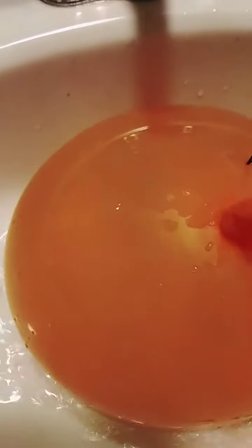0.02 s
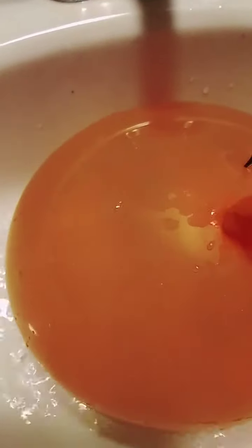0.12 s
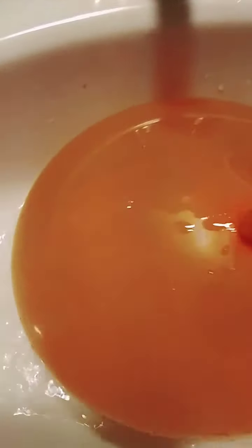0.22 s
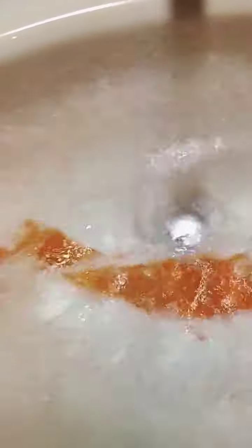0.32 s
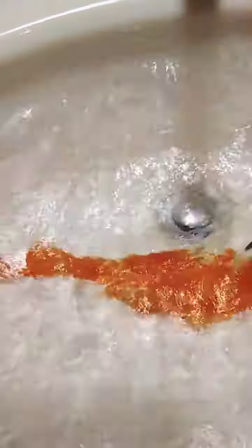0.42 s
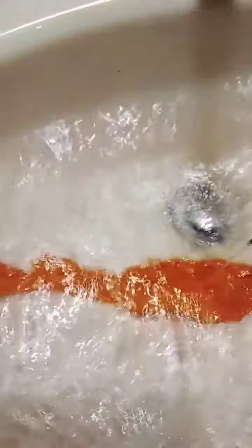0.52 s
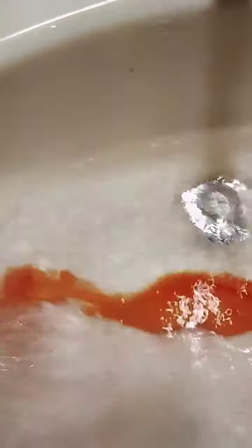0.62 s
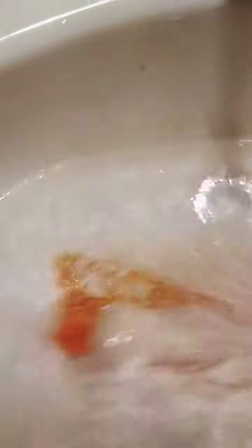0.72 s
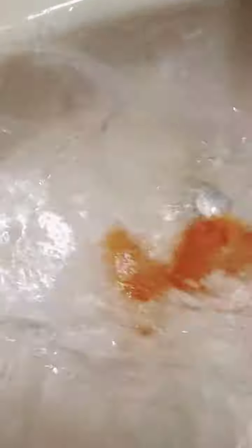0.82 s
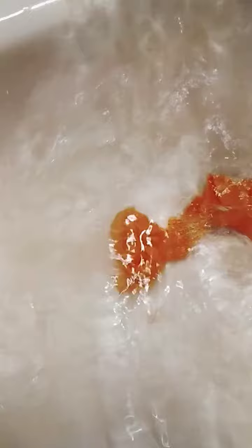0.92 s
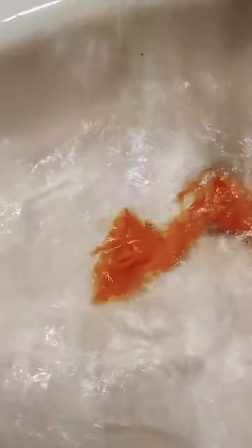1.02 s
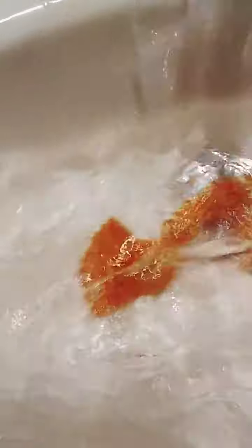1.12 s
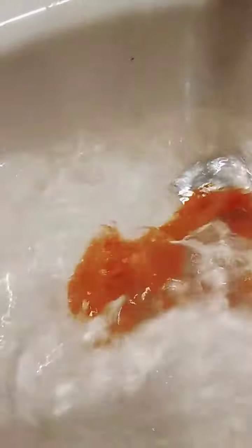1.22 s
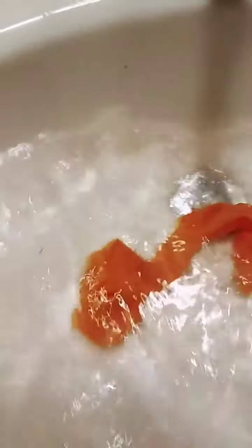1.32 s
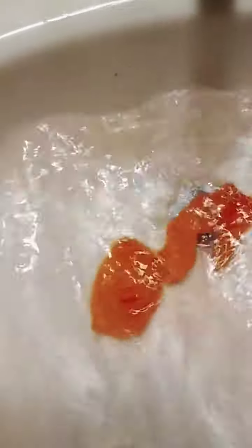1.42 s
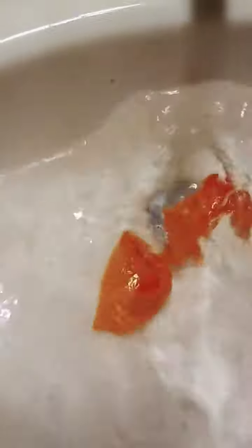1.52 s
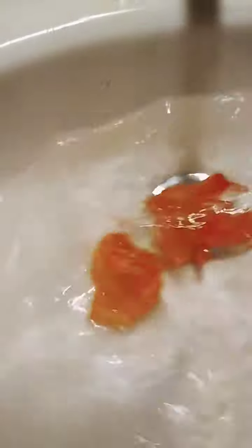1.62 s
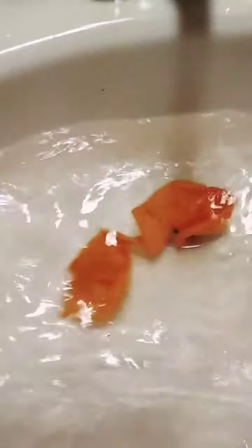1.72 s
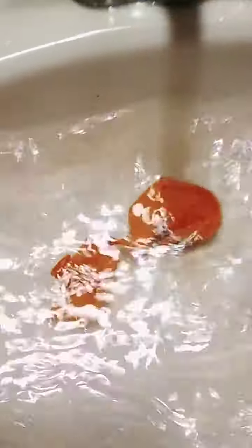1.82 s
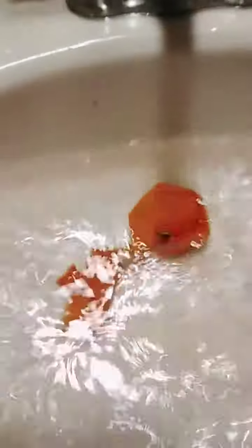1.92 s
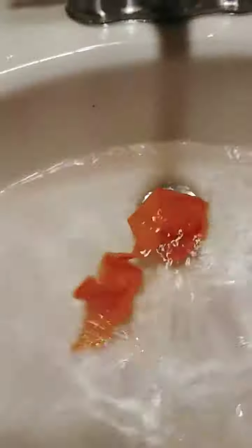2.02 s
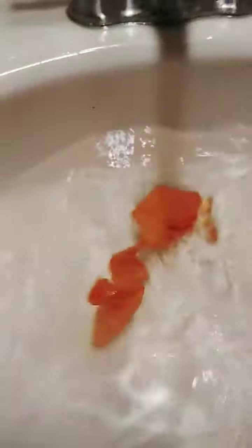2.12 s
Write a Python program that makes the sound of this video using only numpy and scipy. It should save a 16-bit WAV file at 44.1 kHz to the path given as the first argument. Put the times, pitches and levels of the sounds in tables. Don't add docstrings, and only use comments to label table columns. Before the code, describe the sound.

Water balloon bursting in a ceramic sink, heard close in a small tiled room. Near quiet with faint ticks until 0.2 s, then a loud, bright, crackling splash at 0.23 s with a soft low basin thud. Splats, plinks and slosh continue, with fresh surges near 0.65, 0.8 and 0.9 s, thinning after 1.2 s. A small spurt and gulp at 1.5 s, sparse drips, near silence, tiny drops at 2.0 and 2.2 s.

```python
import sys
import numpy as np
from scipy import signal
from scipy.fft import rfft, irfft, next_fast_len
from scipy.io import wavfile

SR = 44100
rng = np.random.default_rng(int(sys.argv[2]) if len(sys.argv) > 2 else 0)


def gain_from_db(level_db):
    decades = np.asarray(level_db, float) / 20
    return 10 ** decades


def digitize_waveform(pressure):
    field = np.atleast_2d(pressure).T
    bounded = np.clip(field, -1, 1)
    quanta = np.round(bounded * 32767).astype(np.int16)
    wavfile.write(sys.argv[1], SR, quanta)


N = 97020

# (frequency [Hz], level [dB])
SPRAY_COLOUR = [(2000, -23), (4500, -5.5), (6500, -12), (8000, -3), (11000, -5), (13500, -14), (16000, -14)]
# (frequency [Hz], level [dB])
SPRAY_EDGE = [(4200, -20), (6000, 1)]
# (time [s], peak level [dB], pitch [Hz], t60 [s])
PLINKS = [(0.173, -41, 3700, 0.047), (0.26, -19.5, 975, 0.047), (0.314, -12.5, 2580, 0.0077),
          (0.406, -16.5, 1410, 0.01), (.615, -32, 1430, 0.088), (0.476, -31, 456, 0.079),
          (0.546, -29, 1597, 0.066), (0.577, -29.5, 2867, 0.03), (0.649, -27.5, 1470, 0.11),
          (0.708, -21.5, 1410, 0.022), (.795, -27.5, 2425, .03), (1.366, -32.5, 2970, 0.023),
          (0.776, -9.5, 2887, 0.015), (0.915, -12.5, 1570, 0.07), (1.025, -23, 1840, 0.023),
          (1.188, -25.5, 1327, 0.076), (.001, -38.5, 1713, 0.056), (1.308, -45, 3185, 0.029),
          (1.47, -46, 3130, 0.034), (1.625, -57.5, 2570, 0.086)]


def level_in_time(rows):
    return gain_from_db(np.interp(np.arange(N) / SR, *np.transpose(rows)))


def colour(x, points):
    hz, db = np.transpose(points)
    log_hz = np.log(np.arange(N // 2 + 1) * SR / N + 1)
    return irfft(rfft(x) * gain_from_db(np.interp(log_hz, np.log(hz), db)), N)


def rms_one(x):
    return x / np.sqrt(np.mean(x ** 2) + 1e-20)


def drift(rate_hz):
    pole = np.exp(-2 * np.pi * rate_hz / SR)
    noise = rng.standard_normal(N + SR)
    return rms_one(signal.lfilter([1], [1, -2 * pole, pole * pole], noise)[SR:])


def ring(push, hz, t60):
    r, w = gain_from_db(-60 / (t60 * SR)), 2 * np.pi * hz / SR
    return signal.lfilter([0, np.sin(w)], [1, -2 * r * np.cos(w), r * r], push + 1e-18)


def add(out, s, x):
    i = int(np.clip(s * SR, 0, N))
    out[i:i + len(x)] += x[:N - i]


def grains(per_s, cycles, spread_db, clump_db, low_hz, high_hz):
    size_db = spread_db * np.minimum(rng.exponential(1, N), 4) + clump_db * drift(29)
    clicks = gain_from_db(size_db) * rng.choice([-1, 1], N) * (rng.random(N) < per_s / SR)
    pitch_class = rng.integers(0, 24, N)
    out = np.zeros(N)
    for k, hz in enumerate(np.geomspace(low_hz, high_hz, 24)):
        out += ring(clicks * (pitch_class == k), hz, cycles / hz)
    return rms_one(out) * np.sqrt(np.mean(out ** 2))


def spray():
    # (time [s], level [dB])
    spray_level = [(0, -35.5), (.1, -72), (.16, -58.5), (.217, -34.5), (.226, -5.5), (.245, -22.5),
                   (.26, -22), (.345, -27.5), (.42, -31), (.63, -42), (.65, -24.5), (.76, -38), (.8, -35.5),
                   (.9, -24.5), (1.12, -44.5), (1.18, -32), (1.3, -50.5), (1.4, -72)]
    # (time [s], level [dB])
    trickle_level = [
        (1.48, -69),
        (1.52, -29.5),
        (1.59, -51),
        (1.65, -50),
        (1.71, -48),
        (1.77, -68),
        (1.92, -78),
        (2, -49),
        (2.1, -78),
        (2.2, -72.5),
    ]
    hiss = grains(14000, cycles=16, spread_db=2.5, clump_db=2, low_hz=2300, high_hz=15500)
    hiss = rms_one(colour(hiss, SPRAY_COLOUR))
    moving = level_in_time(spray_level) * colour(hiss, SPRAY_EDGE)
    trickle_colour = [(5300, -30), (7500, 0), (12000, 0), (13000, -8)]
    trickle = level_in_time(trickle_level) * colour(hiss, trickle_colour)
    return np.where(np.arange(N) < 1.44 * SR, moving, trickle)


def bubbles(per_s, cycles, low_hz, high_hz):
    spread_db, rise_per_cycle = 3.5, .01
    out = np.zeros(N)
    for when, pitch, size, rise in rng.random((4000, 4))[:int(per_s * N / SR)]:
        hz = low_hz * (high_hz / low_hz) ** pitch
        turns = np.arange(int(cycles / hz * SR)) * hz / SR
        level_db = -spread_db * np.log(size + 0.0079) + 8 * pitch - 50 * turns / cycles
        shape = gain_from_db(level_db) * np.minimum(turns / 1.6, 1)
        phase = 2 * np.pi * turns * (1 + rise_per_cycle * rise * turns)
        add(out, when * N / SR, shape * np.sin(phase))
    return rms_one(out)


def splash_level():
    splash_db, splash_s = -13.5, 0.0064
    out, t = np.zeros(N), np.arange(4000) / SR
    for s, db, hz, t60 in PLINKS:
        add(out, s, gain_from_db(db + splash_db - 9 * t / splash_s) * np.minimum(t / .003, 1))
    return out


def slosh():
    # (time [s], level [dB])
    slosh_rows = [(0, -63), (.05, -101), (.2, -101), (.225, -30), (.33, -32), (.53, -46), (.65, -39.5),
                  (.76, -41.5), (.8, -31.5), (.9, -39), (1.03, -39), (1.12, -58.5), (1.16, -38),
                  (1.27, -52.5), (1.4, -85), (2.18, -80.5), (2.192, -52.5)]
    level = level_in_time(slosh_rows) + splash_level()
    return level * bubbles(1800, cycles=16, low_hz=1057, high_hz=6500)


def gurgle():
    # (time [s], level [dB])
    surge_level = [(0, -59.5), (.2, -102), (.23, -52.5), (.29, -33.5), (.38, -55.5), (.47, -30.5),
                   (.58, -51.5), (.7, -61), (1.0, -79), (1.2, -94), (1.27, -62), (1.4, -66), (1.75, -82)]
    # (time [s], level [dB])
    drain_level = [(.2, -79), (.3, -53), (.55, -50), (.7, -63), (.78, -52), (.9, -71), (1.05, -54),
                   (1.15, -70), (1.3, -71), (1.44, -76.5), (1.54, -45), (1.62, -71.5), (1.72, -83.5)]
    surge = level_in_time(surge_level) * bubbles(800, cycles=8, low_hz=300, high_hz=800)
    drain = level_in_time(drain_level) * bubbles(200, cycles=8, low_hz=150, high_hz=480)
    return surge + drain


def plinks():
    rise_oct_per_s, attack_s = 7.7, 0.0013
    out, t = np.zeros(N), np.arange(6000) / SR
    for s, db, hz, t60 in PLINKS:
        phase = 2 * np.pi * np.cumsum(hz * 2 ** (rise_oct_per_s * t)) / SR
        attack = np.sin(np.pi / 2 * np.minimum(t / attack_s, 1)) ** 2
        add(out, s, gain_from_db(db - 60 * t / t60) * attack * np.sin(phase))
    return out


def gulps():
    # (time [s], length [s], level [dB], start pitch [Hz], end pitch [Hz])
    gulp_rows = [(.008, 0.062, -51, 576, 760), (0.034, 0.015, -45.5, 730, 1240),
                 (0.308, 0.029, -30.5, 209, 237), (0.775, 0.035, -33.5, 1102, 1310),
                 (0.806, 0.025, -26, 994, 1683), (0.915, 0.027, -25, 766, 1150),
                 (0.948, 0.034, -27.5, 754, 1510), (1.215, 0.021, -32.5, 898, 1099),
                 (1.322, 0.022, -32.5, 1100, 2845), (1.371, .088, -38, 620, 1490),
                 (0.59, 0.014, -30.5, 3470, 5300), (1.305, 0.011, -49, 1150, 1200),
                 (1.479, 0.012, -42, 430, 700), (1.495, 0.073, -39, 557, 2041),
                 (1.521, 0.105, -48.5, 323.5, 449)]
    bend = 1.4
    out, wobble = np.zeros(N), 1 + .2 * drift(60)
    for s, length, db, start_hz, end_hz in gulp_rows:
        u = np.linspace(0, 1, int(length * SR))
        phase = 2 * np.pi * np.cumsum(start_hz + (end_hz - start_hz) * u ** bend) / SR
        swell = np.minimum(u / 0.19, 1) ** 1.5
        fade = np.minimum((1 - u) / .5, 1)
        add(out, s, gain_from_db(db) * swell * fade * np.sin(phase))
    return out * wobble


def burst(db, hz, length, spread_oct):
    ring_cycles = 46.9
    when, pitch, size = rng.random(12), rng.standard_normal(12), rng.random(12)
    when[0], pitch[0], size[0] = .15, 0, 0
    bunch, t = np.zeros(2400), np.arange(400) / SR
    for k in range(12):
        f = min(hz * 2 ** (spread_oct * pitch[k]), 15500)
        attack = np.minimum(t * f / 4, 1) ** 2
        grain = np.sin(2 * np.pi * f * t) * gain_from_db(-60 * t * f / ring_cycles) * attack
        add(bunch, min(when[k] * length, .04), gain_from_db(db - 4.8 * when[k] - 16 * size[k]) * grain)
    return bunch


def splats():
    # (time [s], peak level [dB], pitch [Hz], length [s])
    full_splats = [(0.0103, -21.5, 8360, .003), (0.1155, -37.5, 10000, .007), (.126, -42.5, 10500, .004),
                   (0.163, -42, 8300, .004), (0.171, -26, 10000, .0057), (0.194, -20, 8200, .0086),
                   (0.209, -21, 8100, .005), (0.2202, 2, 8530, .003), (0.2238, 3, 7890, .005),
                   (0.2321, 9, 8840, .005), (0.238, 6, 7960, .006), (.281, -11.5, 8500, .003),
                   (0.312, -2.5, 7970, .003), (.316, -4, 6820, .003), (0.325, -4, 7740, .005),
                   (0.3396, -1, 7740, .005), (.398, -10.5, 8450, .005), (0.4502, -13, 7850, .003),
                   (0.478, -10, 8850, .005), (0.5463, -6.5, 7500, .003), (.591, -20, 7850, .005),
                   (0.602, -22.5, 9700, .003), (0.6367, -4, 7800, .004), (.646, -6, 8050, .004),
                   (0.7355, -17.5, 11600, .004), (0.756, -21.5, 8900, .003), (0.7722, -0.5, 7900, .005),
                   (0.7935, -9, 7670, .005), (.806, -10, 8000, .005), (0.842, -13.5, 8700, .007),
                   (.856, -10.5, 8400, .004), (.8725, 1, 7670, .003), (.9, -7, 7950, .003),
                   (0.941, -6, 7860, .005), (0.973, -16.5, 8650, .004)]
    # (time [s], peak level [dB], pitch [Hz])
    late_splats = [(1.0202, -17.5, 8500), (1.0246, -12, 7700), (1.0347, -12.5, 8820), (1.0956, -16, 10200),
                   (1.1374, -11.5, 9320), (1.1436, -13.5, 6870), (1.1663, -12, 7000), (1.186, -13.5, 7700),
                   (1.2234, -26.5, 6260), (1.2331, -22, 9200), (1.2578, -24.5, 8750), (1.295, -32, 7760),
                   (1.3097, -31, 6960), (1.3824, -49.5, 7010), (1.4115, -48, 10800), (1.4953, -23, 11600),
                   (1.5163, -14, 8600), (1.5228, -17, 6900), (1.5874, -30, 9900), (1.5965, -33.5, 6910),
                   (1.6035, -15, 9630), (1.6144, -48, 6580), (1.622, -21.5, 7460), (1.6643, -32.5, 6650),
                   (1.6726, -24, 12500), (1.6913, -20.5, 9900), (1.7016, -28.5, 10200),
                   (1.771, -42.5, 9210), (1.9378, -48, 8470), (1.9617, -41.5, 7700), (1.9871, -34, 7070),
                   (1.9939, -32.5, 10940), (2.1442, -57.5, 7660), (2.189, -23, 8800), (2.1954, -19.5, 8400)]
    # (time [s], peak level [dB], pitch [Hz])
    slap_rows = [(0.1913, -21, 5300), (0.207, -17, 5570), (0.313, -8, 2440), (0.3662, -24, 5300),
                 (0.3955, -13, 4420), (0.4752, -13.5, 4200), (0.547, -15, 3210), (0.6384, -12.5, 4000),
                 (0.6481, -10.5, 2950), (0.706, -12, 3430), (0.734, -18.5, 3270), (0.7642, -33, 2970),
                 (0.796, -18, 3100), (0.8537, -13.5, 4230), (1.059, -24, 3400), (1.163, -16.5, 5300),
                 (1.2222, -15.5, 4600), (1.4966, -30, 5200), (1.688, -55.5, 2730)]
    late_s, hiss_db, hiss_rise_s = .0026, -10.5, 0.0012
    out, hiss_level, t = np.zeros(N), np.zeros(N), np.arange(2000) / SR
    for s, db, hz, length in full_splats + [(*row, late_s) for row in late_splats]:
        add(out, s, burst(db + 0.5, hz, length, spread_oct=0.17))
        add(hiss_level, s, gain_from_db(db + hiss_db - 9 * t / length) * np.minimum(t / hiss_rise_s, 1))
    for s, db, hz in slap_rows:
        add(out, s, burst(db - 2.5, hz, length=0.0061, spread_oct=.35))
    hiss = colour(colour(rng.standard_normal(N), SPRAY_COLOUR), SPRAY_EDGE)
    return out + hiss_level * rms_one(hiss)


def basin():
    # (time [s], peak level [dB])
    surge_rows = [(0.218, -35), (0.273, -31.5), (0.326, -43), (0.447, -50), (0.542, -40), (0.608, -44),
                  (0.793, -42.5), (0.858, -49), (0.945, -39), (1.154, -49.5), (1.294, -51.5),
                  (1.387, -61.5), (1.548, -65), (1.09, -53), (1.239, -52), (1.5, -63.5), (1.64, -68),
                  (1.794, -54), (1.85, -63), (2.169, -63.5)]
    # (frequency [Hz], level [dB], t60 [s])
    modes = [
        (73, 4.5, 0.28),
        (101.3, -9, 0.45),
        (123.9, 7.5, 0.15),
        (206, -31.5, .1),
    ]
    surge_s = 0.015
    out, t = np.zeros(N), np.arange(3000) / SR
    for hz, mode_db, t60 in modes:
        push = np.zeros(N)
        for s, db in surge_rows:
            add(push, s, gain_from_db(db + mode_db - 45.5 - 9 * t / surge_s) * np.minimum(t / .004, 1))
        out += ring(push * drift(270), hz, t60)
    return out


def room(x):
    t60_s, wall_cut_hz = 0.17, 11000
    size = next_fast_len(N + SR)
    w = 2 * np.pi * np.arange(size // 2 + 1) / size
    dull = 1 / (1 + 1j * w * SR / (2 * np.pi * wall_cut_hz)) ** .2
    echo = 0
    for k, lag in enumerate(rng.uniform(.003, .017, 12) * SR):
        loop = gain_from_db(-60 * lag / SR / t60_s) * dull * np.exp(-1j * w * lag)
        echo = echo + (-1) ** k * loop / (1 - loop)
    return irfft(rfft(x, size) * echo, size)[:N]


def quiet_floor():
    # (frequency [Hz], level [dB])
    floor_colour = [(50, -13), (125, -7), (300, -24), (600, -23.5), (1000, -16.5), (1800, -35),
                    (16000, -46)]
    return gain_from_db(-75.5) * rms_one(colour(rng.standard_normal(N), floor_colour))


def scene():
    water = spray() + slosh() + gurgle() + splats()
    ringing = plinks() + gulps()
    echoes = gain_from_db(-21.5) * room(water + gain_from_db(0.5) * ringing)
    return (water + ringing + echoes + basin() + quiet_floor())[None]


def band_limit(x):
    return signal.sosfilt(signal.butter(12, 16460, fs=SR, output="sos"), x)


def record(dry):
    rounded = .82 * np.tanh(dry / .82)
    x = signal.sosfilt(signal.butter(3, 64, "high", fs=SR, output="sos"), rounded)
    x = signal.sosfilt(signal.cheby2(10, 60, 16700, fs=SR, output="sos"), x)
    return band_limit(x)


dry = scene()
out = record(dry)
digitize_waveform(out)
```